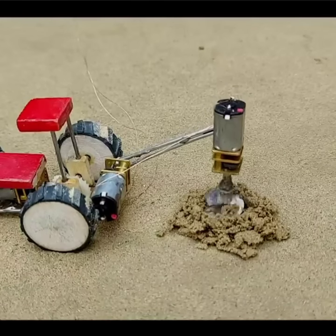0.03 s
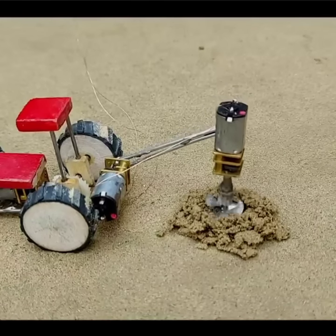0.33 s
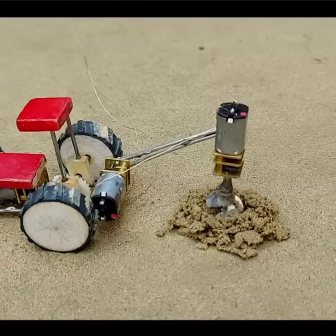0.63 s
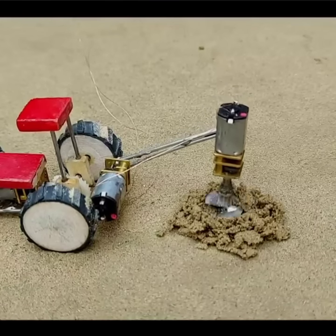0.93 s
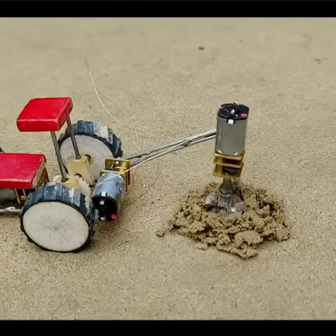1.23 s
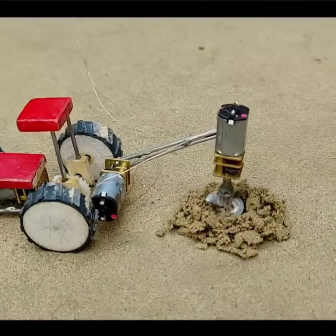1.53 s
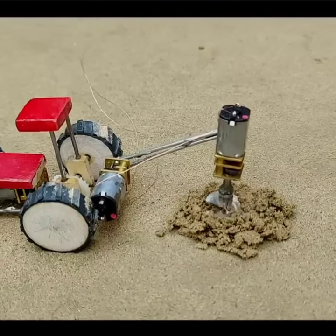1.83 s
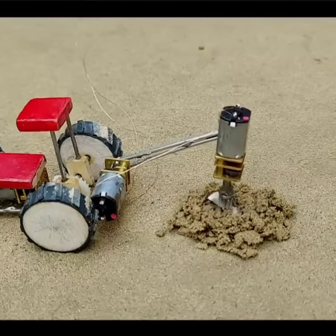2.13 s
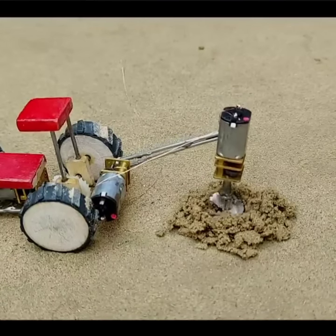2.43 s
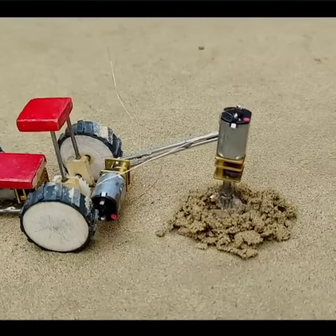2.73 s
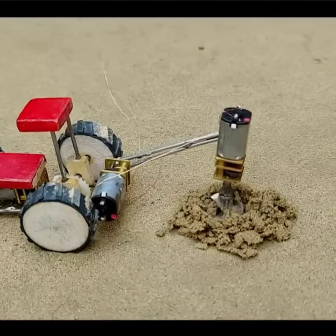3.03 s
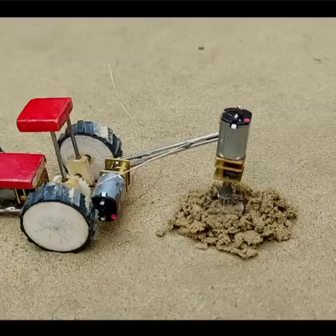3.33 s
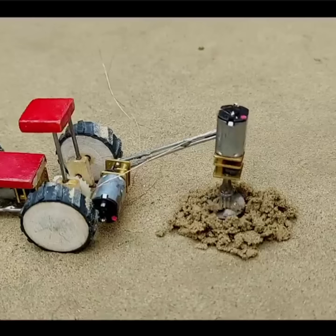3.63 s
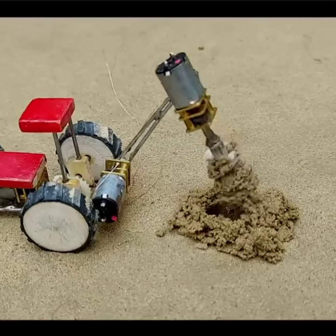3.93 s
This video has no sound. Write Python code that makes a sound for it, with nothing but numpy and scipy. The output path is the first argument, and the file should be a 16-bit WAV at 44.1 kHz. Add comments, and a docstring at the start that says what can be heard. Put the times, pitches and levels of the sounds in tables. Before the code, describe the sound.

A tiny geared motor drills into loose soil with a steady high whine and gritty rattle. Near the end it eases, then switches abruptly to a faster, thinner, quieter buzz with brief chatter. Heard close by, outdoors.

```python
"""Outdoors, close by, a tiny geared motor turns a drill bit into loose soil. The loaded gear teeth whine and
rattle in step with the rotor (the motor's spinning core), and an off-centre gear makes the rattle flutter. The
grinding eases, then the scene changes abruptly to the buzz of a motor running free: faster, thinner and
quieter, with brief chatter, over a low rumble."""
import sys
import numpy as np
from scipy import signal
from scipy.fft import rfft, irfft
from scipy.io import wavfile

SR = 44100
rng = np.random.default_rng(int(sys.argv[2]) if len(sys.argv) > 2 else 0)


def store_wav(level_fs):
    """Save 16-bit WAV to argv[1]."""
    pcm = np.round(np.clip(np.atleast_2d(level_fs), -1, 1) * 32767)
    wavfile.write(sys.argv[1], SR, pcm.T.astype(np.int16))


N = 176400
T = np.arange(N) / SR
HZ = np.maximum(np.fft.rfftfreq(N, 1 / SR), 1)

CLICKS_PER_S, SNAPS_PER_S = 7000, 520  # light and hard knocks of the gear teeth
# Hard snaps of the teeth ring the brass frame. Each row: frequency in Hz, relative level in dB.
SNAP_COLOUR = [(500, -29), (2200, -10), (4300, -8.5), (5700, 0), (7300, -4), (8800, -7), (15000, -28)]


def drilling():
    """Loaded gears whine at multiples of the rotor speed and rattle as the tooth pressure pulses."""
    # Pitch of the main whine. Each row: time in seconds, pitch in Hz.
    whine = [(0, 1932), (.12, 1885), (.2, 1916), (.44, 1890), (.57, 1917), (.78, 1912), (.86, 1894),
             (1.12, 1907), (1.4, 1901), (1.52, 1900), (1.63, 1876), (1.79, 1882), (1.84, 1920),
             (2.44, 1910), (2.56, 1886), (2.64, 1913), (2.88, 1891), (3.15, 1916), (3.3, 1895),
             (3.72, 1904)]
    # Loudness of the drilling. Each row: time in seconds, level in dB.
    loudness = [(0, -29.2), (1.0, -29), (1.78, -29), (1.9, -29), (2.92, -29), (3.12, -30), (3.23, -28.5),
                (3.32, -29.6), (3.36, -32.5), (3.52, -32), (3.57, -35.5), (3.64, -36), (3.68, -34)]
    # Gear tones. Each row: multiple of rotor speed, relative level in dB, throb and roughness (0 to 1).
    gear_tones = [(8, -22.5, 0.6, .55), (13, -29, 0.3, 0.3), (16, -12.5, 0.02, 0.17), (17, -23, 0.1, 0.16),
                  (19, -23.5, 0.4, .4), (25, -25, .2, .4), (32, -23, 0.1, 0.3)]
    # Pressure on the teeth. Each row: pulses per rotor turn, swing in dB.
    pulses = [(1, 0.47), (2, 0.6), (3, 1.74), (5, 1.6), (8, 1.05), (9, 0.9)]
    # Tone of the rattle. Each row: frequency in Hz, relative level in dB.
    rattle_colour = [(60, -21), (230, -12.5), (600, -12), (1300, -7), (2300, -2), (3600, -4.5),
                     (6600, -1.3), (8700, -6), (12500, -5), (15500, -7.5)]
    # Where the gearbox rings or sounds hollow. Each row: frequency in Hz, width in Hz, boost in dB.
    gearbox = [(324, 68, 10), (950, 97, 7.5), (1290, 100, 3.5), (1545, 60, 3), (1950, 91, 4), (2140, 70, 4),
               (2265, 110, 2.5), (2540, 160, 2.5), (3000, 140, 5), (3130, 150, -2.5), (3390, 135, 5),
               (3610, 190, -4), (3750, 100, 5), (4410, 120, 3.5), (4960, 240, -3), (5445, 420, 5),
               (5820, 180, 3), (7500, 210, 3), (9800, 300, 4), (9770, 420, 1.5), (11180, 270, -4),
               (11720, 650, 4.5)]
    whine_cycles_per_turn, gear_ratio = 16, 43 / 119
    throb_hz, rough_hz, slack_cycles = 4.8, 40, 0.23

    sway = cycle(throb_hz * T + 0.246 * drift(2.045))  # a slightly uneven throb
    wobble = 1 + 0.0022 * sway + 0.00254 * drift(25.32)  # the speed sways and trembles
    rotor_hz = in_time(whine) / whine_cycles_per_turn * wobble
    turns = np.cumsum(rotor_hz) / SR
    pressure = from_db(sum(swing_db * cycle(round(k) * turns) for k, swing_db in pulses))
    flutter = from_db(1.32 * cycle(gear_ratio * turns))  # once per turn of the off-centre gear
    contacts = clicks(CLICKS_PER_S) + rng.standard_normal(N)  # equal parts clicks and hiss
    rattle = from_db(0.5) * colour(contacts * pressure * flutter, rattle_colour, gearbox)
    grit = from_db(2.1 * drift(20))  # the snaps swell as the bit meets grit
    snaps = from_db(-9) * colour(clicks(SNAPS_PER_S) * pressure * flutter * grit, SNAP_COLOUR)
    tones = np.zeros(N)
    for multiple, db, throb, roughness in gear_tones:
        slip = slack_cycles * throb * drift(9.1)  # slack lets throbbing tones slip out of step
        tone = cycle(round(multiple) * turns + slip)
        swell = 1 + throb * sway + roughness * drift(rough_hz)
        tones += from_db(db) * rms_one(tone * swell)
    return from_db(in_time(loudness)) * (rattle + snaps + tones)


def running_free():
    """With no load, the brushes (sliding contacts) tick on every turn while the slack gears rattle."""
    # Loudness of the buzz, rattle and snaps. Each row: time in seconds, level in dB.
    loudness = [(3.73, -40), (3.78, -39.5), (3.84, -40), (3.87, -37.5), (3.93, -39), (3.97, -36.5)]
    # Gear tones. Each row: multiple of rotor speed, level in dB.
    gear_tones = [(4, -60.5), (7, -61), (8, -62), (9, -64), (10, -58.5), (13, -57), (58, -62), (60, -51)]
    # Tone of the loose rattle and of the brush buzz. Each row: frequency in Hz, relative level in dB.
    rattle_colour = [(100, -26), (520, -19.5), (1100, -13.5), (1600, -7), (2200, -9.5), (2550, -0.5),
                     (3500, -4), (5500, 0), (7800, -10.5), (9700, -3), (15500, -4.5)]
    brush_colour = [(300, -25), (1500, -10), (5000, -4), (8500, -9), (11500, 0), (13500, 2), (15500, 0)]
    rotor_hz = 194.6

    turns = np.cumsum(rotor_hz * (1 + .0008 * drift(14.3))) / SR
    ticks = np.zeros(N)
    for angle in rng.random(size=6):  # the same six spots on every turn
        samples_from_tick = ((turns + angle) % 1 - .5) * SR / rotor_hz
        strength = rng.choice([-1, 1]) * (1 + 0.42 * drift(150))
        ticks += strength * np.sinc(samples_from_tick)
    brushes = from_db(-5) * colour(ticks, brush_colour)
    rattle = from_db(4) * colour(clicks(CLICKS_PER_S), rattle_colour)
    snaps = from_db(-9) * colour(clicks(SNAPS_PER_S), SNAP_COLOUR)
    tones = sum(from_db(db) * rms_one(cycle(round(k) * turns)) for k, db in gear_tones)
    return from_db(in_time(loudness)) * (brushes + rattle + snaps) + tones


def chatter():
    """Short bursts of knocks ring the frame while the motor runs free."""
    # The bursts. Each row: middle in seconds, level in dB, half length in seconds.
    bursts = [(3.733, -30, .0015), (3.762, -36, .004), (3.894, -30, .005), (3.917, -29, .002)]
    # Ring of the frame. Each row: frequency in Hz, relative level in dB.
    frame_colour = [(1000, -27), (3600, -14), (5100, 0), (6200, -5), (8000, -18), (15000, -14)]
    loudness = sum(from_db(db) * np.exp(-.5 * ((T - middle) / half) ** 2) for middle, db, half in bursts)
    return loudness * colour(clicks(CLICKS_PER_S), frame_colour)


def outdoor_rumble():
    """A low background rumble swells now and then."""
    # Loudness of the rumble. Each row: time in seconds, level in dB.
    loudness = [(0, -53), (.26, -53), (.34, -49), (.44, -53), (1.1, -53.5), (1.55, -47.5), (2.0, -54.5),
                (2.6, -53), (2.83, -48.5), (3.0, -53.5), (3.7, -58), (3.82, -52)]
    # Its deep tone. Each row: frequency in Hz, relative level in dB.
    rumble_colour = [(20, -21), (35, -11.5), (69, 1), (100, -2), (160, -4), (220, -18), (400, -24),
                     (1500, -37.5)]
    return from_db(in_time(loudness)) * colour(rng.standard_normal(N), rumble_colour)


def from_db(db):
    """Turn decibels into a number to multiply by."""
    return 10 ** (np.asarray(db) / 20)


def rms_one(x):
    """Scale a signal so its average strength (rms) is 1."""
    return x / np.sqrt(np.mean(x ** 2) + 1e-20)


def in_time(rows):
    """Join (time, value) points with straight lines, giving a value at every sample."""
    return np.interp(T, *np.transpose(rows))


def drift(rate_hz):
    """Random wandering of strength 1, mostly slower than rate_hz."""
    return rms_one(irfft(rfft(rng.standard_normal(N)) / (1 + (HZ / rate_hz) ** 2), N))


def colour(x, points, resonances=()):
    """Shape a sound's tone with a broad curve plus narrow peaks and dips; the result has strength 1."""
    hz, db = np.transpose(points)
    db = np.interp(np.log(HZ), np.log(hz), db)
    for centre, width, boost in resonances:
        db = db + boost / (1 + (2 * (HZ - centre) / width) ** 2)
    cepstrum = irfft(np.log(from_db(db)), N)
    response = np.exp(rfft(2 * cepstrum[:N // 2], N))  # rings after each click, not before
    return rms_one(irfft(rfft(x) * response, N))


def clicks(per_s, spread_db=2.5):
    """Clicks of uneven size at random times, with overall strength 1."""
    sizes = from_db(spread_db * np.minimum(rng.exponential(1, N), 4))
    return rms_one(sizes * rng.choice([-1, 1], N) * (rng.random(N) < per_s / SR))


def cycle(turns):
    """A sine wave that follows a rotation from a random starting angle."""
    return np.sin(2 * np.pi * (turns + rng.random()))


def scene():
    """The scene changes abruptly from the grinding to the free-running buzz; both ears hear the same."""
    switch_s, fade_s = 3.722, 0.013
    free = np.clip((T - switch_s) / fade_s + .5, 0, 1)  # 0 while drilling, 1 while running free
    motor = np.sqrt(1 - free) * drilling() + np.sqrt(free) * running_free()
    mono = motor + chatter() + outdoor_rumble()
    return np.array([mono, mono])


def record(dry):
    """Cut away the very highest treble."""
    cutoff_hz = 15480
    low_pass = signal.firwin(801, cutoff_hz, window="blackman", fs=SR)
    return signal.fftconvolve(dry, low_pass[None], "same", axes=1)


dry = scene()
out = record(dry)
store_wav(out)
```